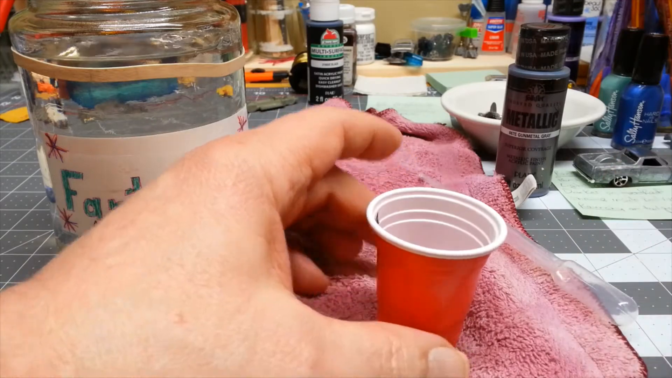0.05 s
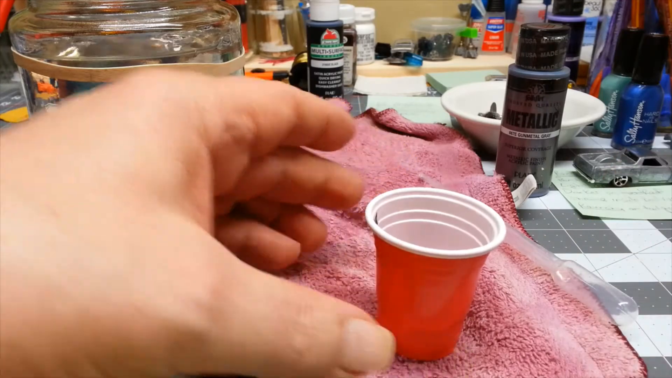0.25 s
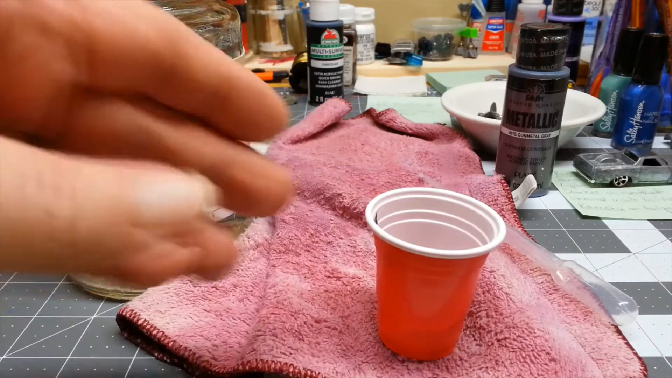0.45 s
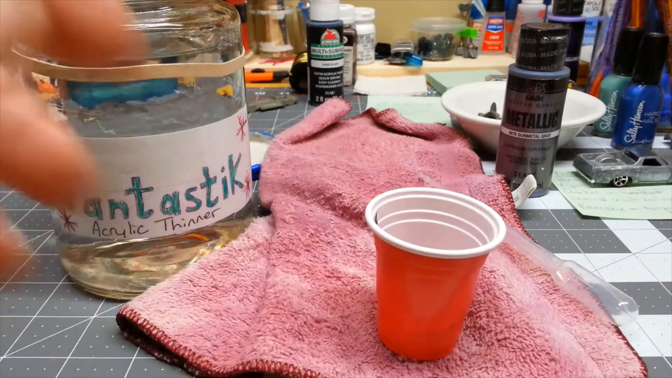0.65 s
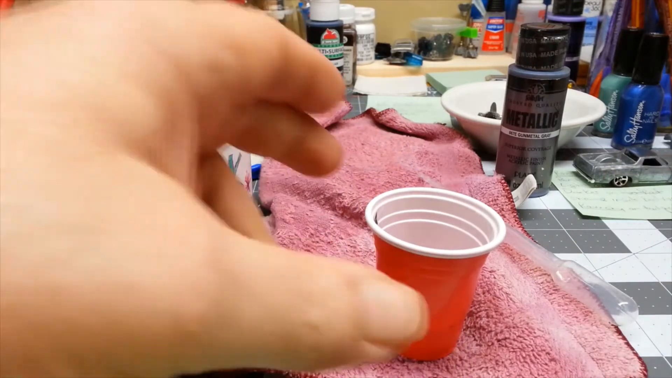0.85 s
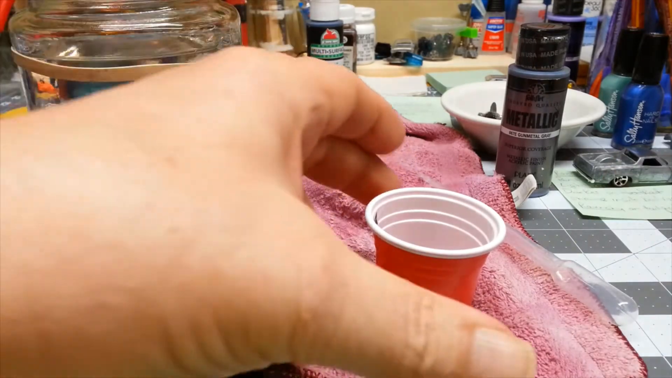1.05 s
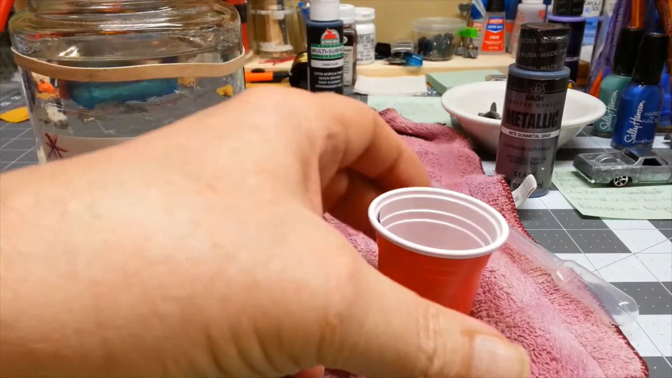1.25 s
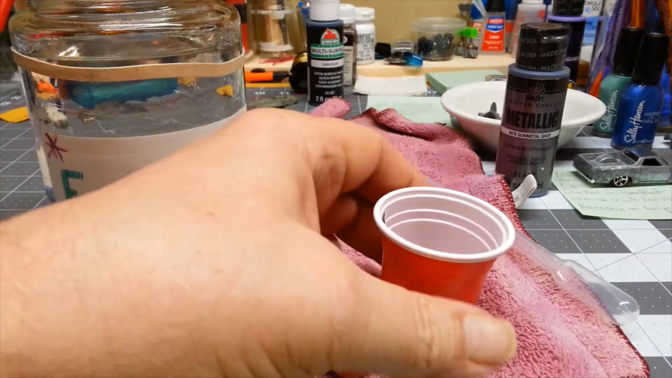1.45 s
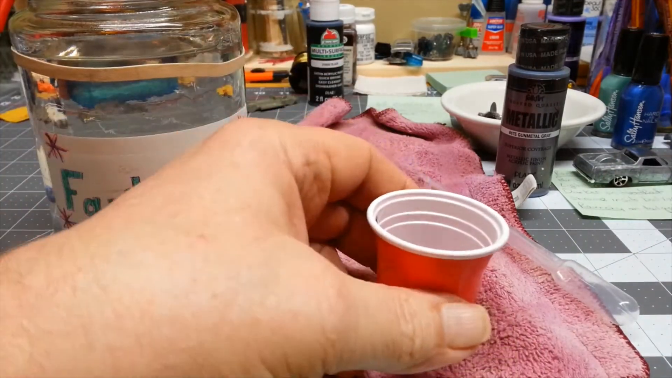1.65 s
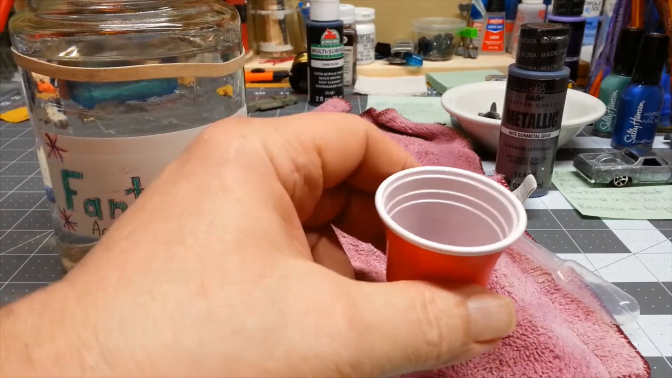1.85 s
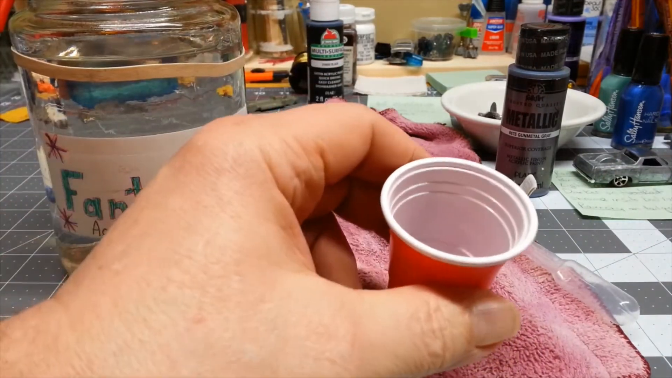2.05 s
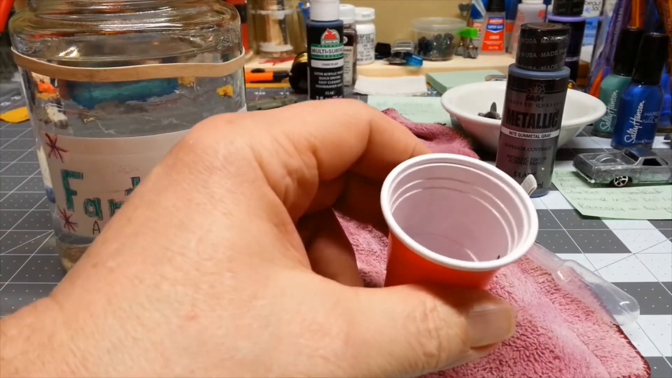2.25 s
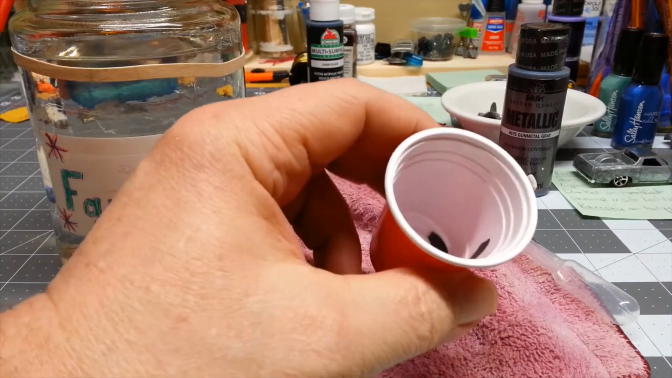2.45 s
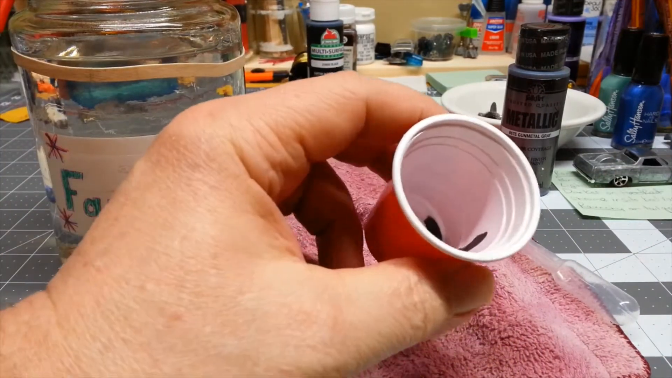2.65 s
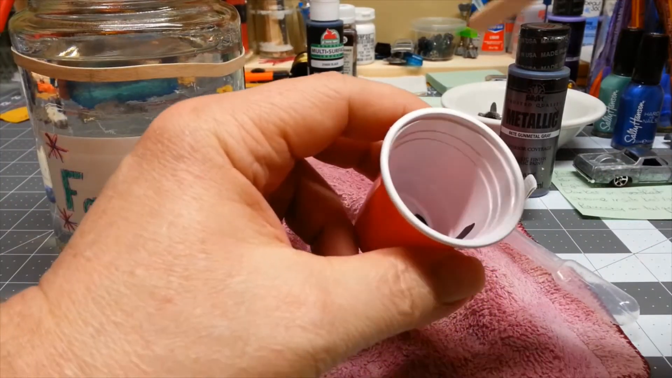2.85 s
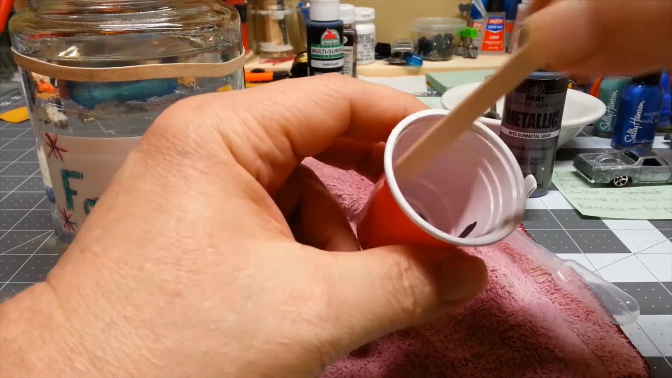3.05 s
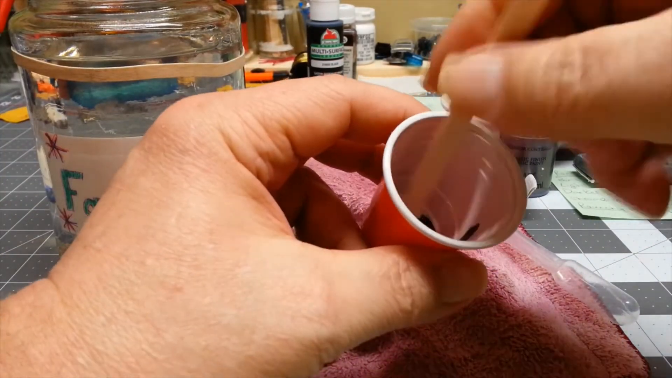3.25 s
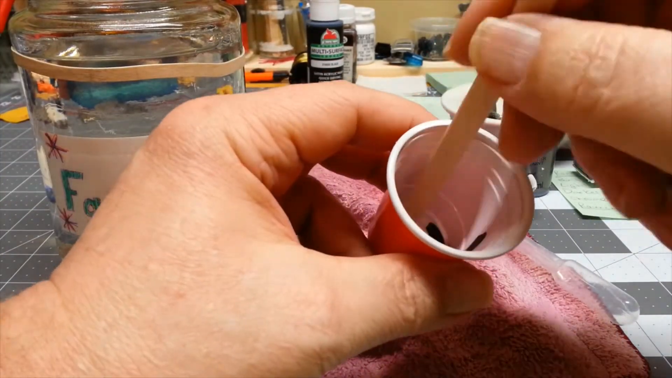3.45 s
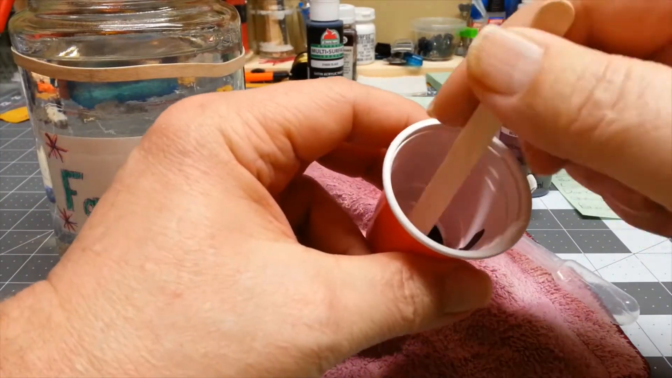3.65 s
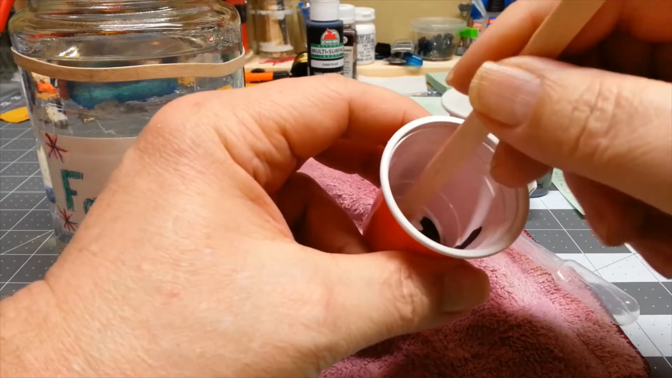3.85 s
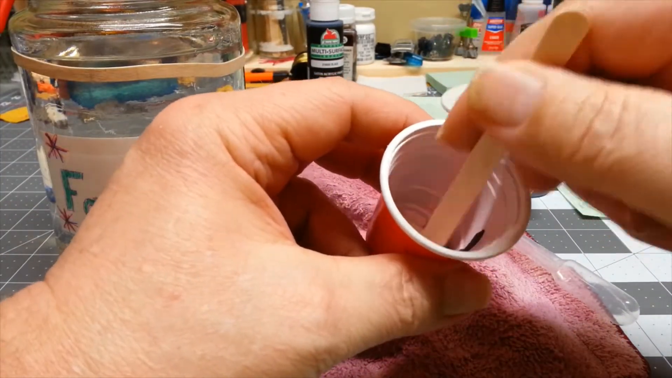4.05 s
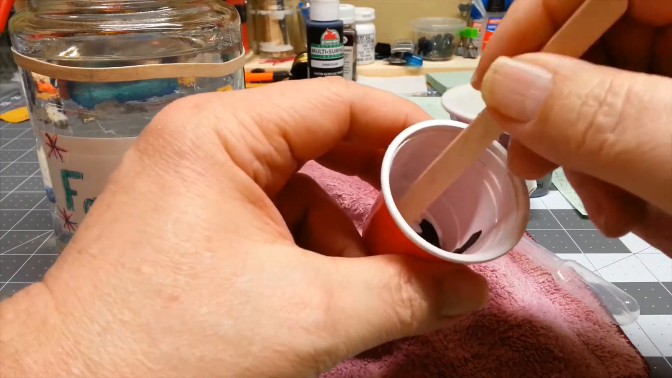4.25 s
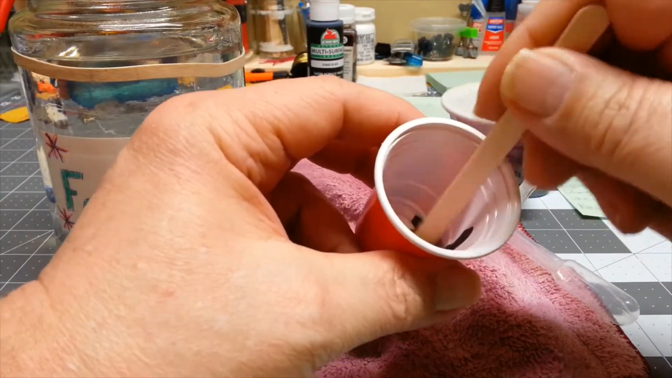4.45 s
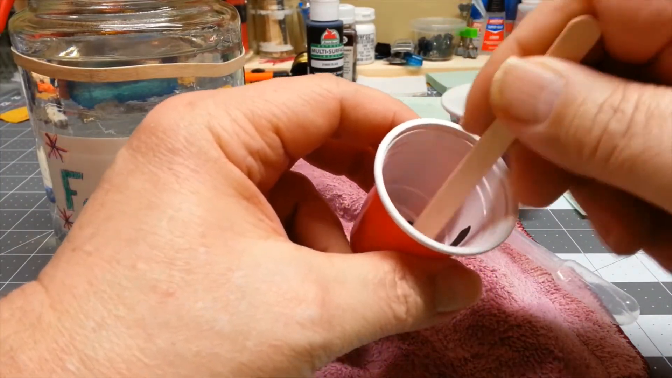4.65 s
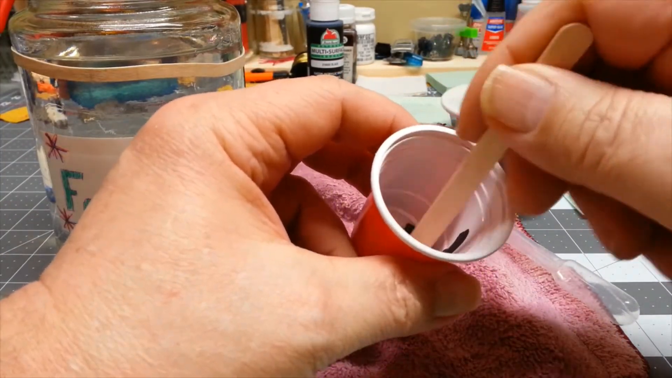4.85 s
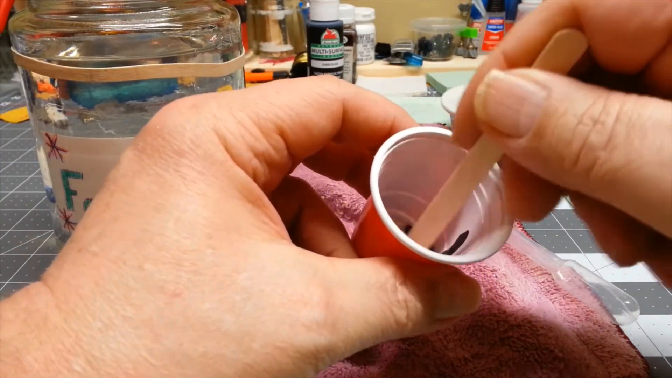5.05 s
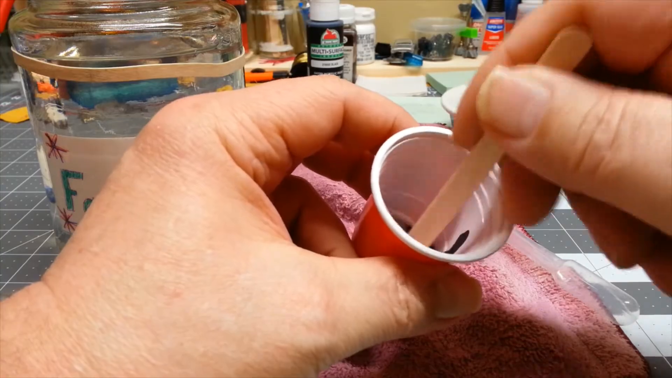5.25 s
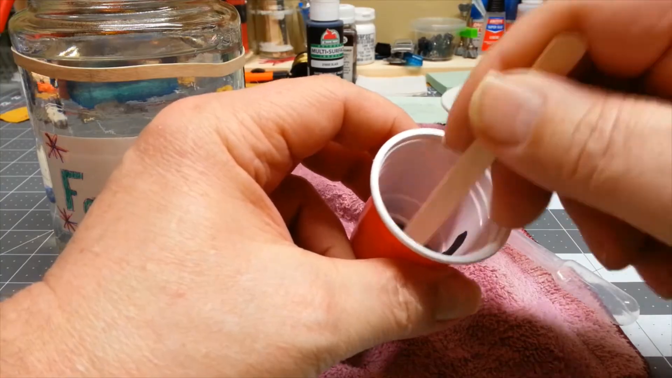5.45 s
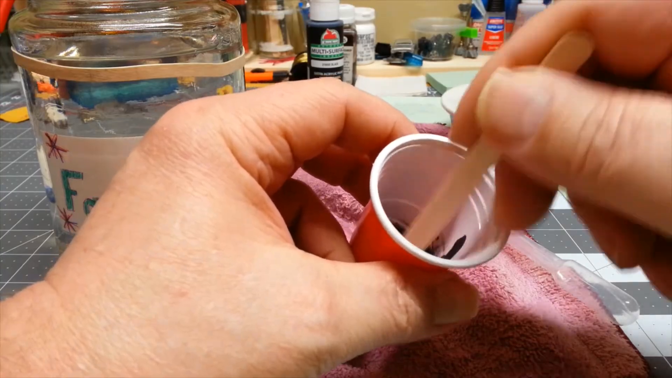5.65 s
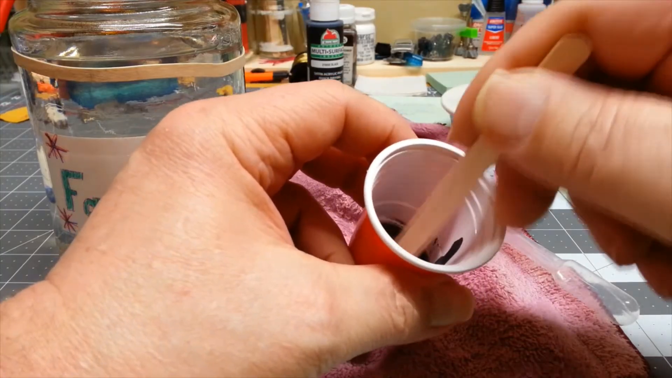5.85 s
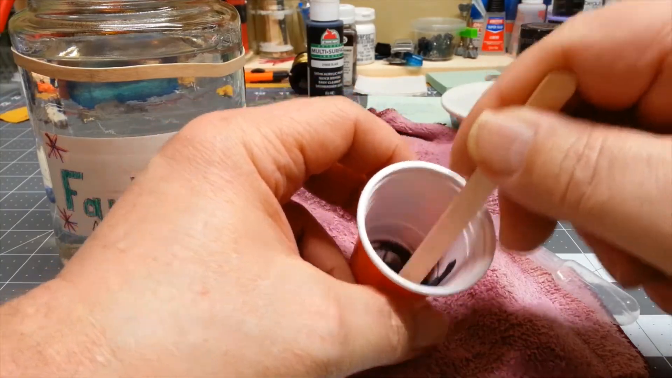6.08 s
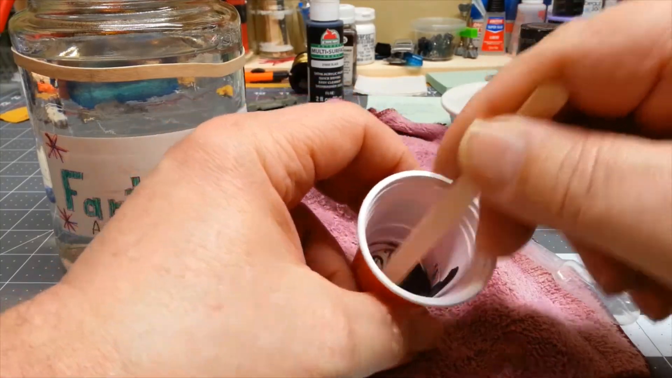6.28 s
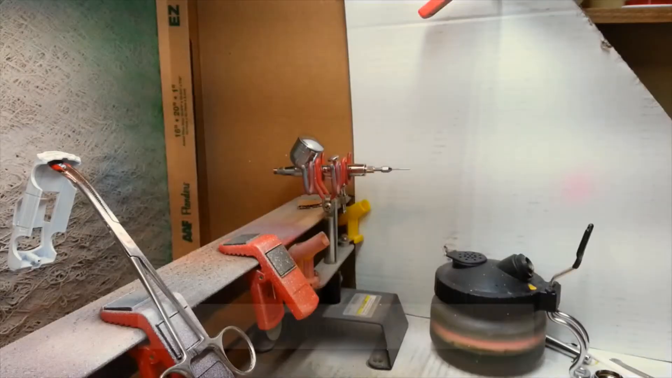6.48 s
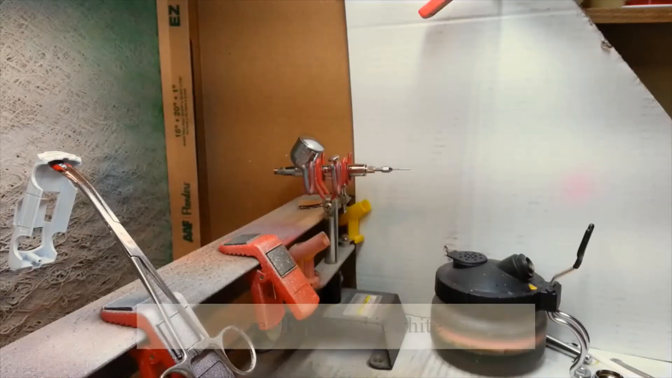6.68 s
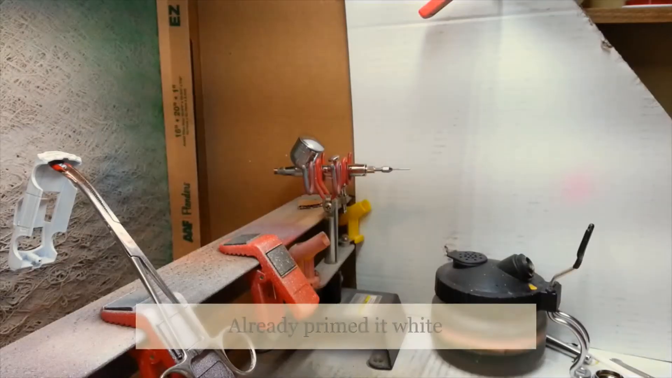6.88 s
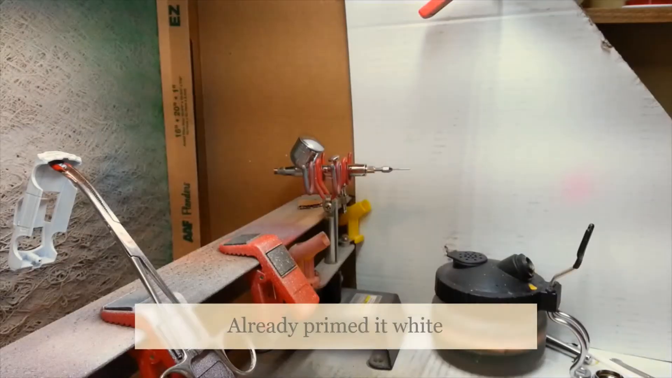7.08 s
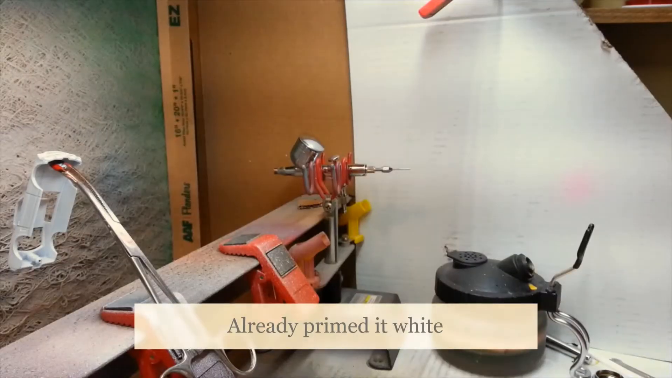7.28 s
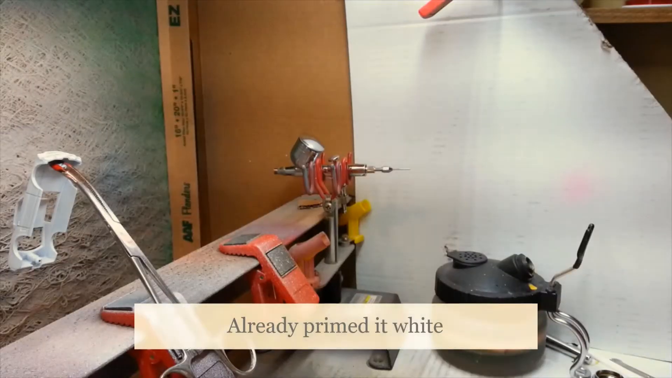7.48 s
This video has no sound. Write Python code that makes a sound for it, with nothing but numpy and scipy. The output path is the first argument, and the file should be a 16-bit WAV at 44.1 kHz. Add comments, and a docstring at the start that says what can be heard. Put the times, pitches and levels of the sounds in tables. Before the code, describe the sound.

Close to a stereo microphone in a quiet workshop, skin rubs on a towel and on a small plastic cup, with soft bumps and a couple of crisp plastic snaps. Next, a wooden stick clicks and scrapes irregularly around the inside of the cup for a few seconds. The stirring ends abruptly as a running extractor fan takes over, with rushing air and a low motor hum.

```python
"""Stick in a plastic cup, then a fan

Close to a stereo microphone on a workshop bench, a hand slides over a towel and takes up a small plastic
cup. A wooden stick taps and scrapes inside it, ringing the wall. Quiet room tone with mains hum swells
whenever a noise suppressor opens. At the end the scene cuts to a running extractor fan."""
import sys
import numpy as np
from scipy import signal
from scipy.fft import rfft, irfft
from scipy.io import wavfile
from scipy.ndimage import uniform_filter1d

SR = 44100
rng = np.random.default_rng(int(sys.argv[2]) if len(sys.argv) > 2 else 0)


def persist_wave(psi):
    """Save psi, clipped to +-1, as 16-bit WAV."""
    counts = np.round(np.clip(psi, -1, 1) * 32767).astype(np.int16)
    wavfile.write(sys.argv[1], SR, np.atleast_2d(counts).T)


N = 331632
TIME_S = np.arange(N) / SR

# Noise spectra. Each row: frequency in Hz, relative density in dB.
ROOM_SPECTRUM = [(40, -6.5), (90, -2), (222, -6), (328, -0.5), (380, -6.5), (697, -17), (2540, -21.5),
                 (7610, -22.5), (11500, -19.5), (14500, -24), (14900, -55.5)]
FAN_SPECTRUM = [(25, -48), (50, -22.5), (85, -11), (165, -10), (215, -15), (361, -13), (640, -17.5),
                (750, -16), (1590, -27), (1900, -24.5), (2700, -29), (3750, -25.5), (4840, -32.5),
                (7600, -31.5), (11800, -49.5), (13000, -80)]
RUSTLE_SPECTRUM = [(530, -44), (900, -33), (1650, -17.5), (2070, -3.5), (2760, -6.5), (3890, 0.5),
                   (8050, 0), (12000, -15), (14500, -12), (14900, -71.5)]
RUB_SPECTRUM = [(88, -44.5), (150, -8.5), (485, -4), (889, -6), (1510, -4), (1670, -3.5), (3500, -17),
                (4550, -34.5), (7700, -120)]
# Likeness at the microphone's two ports. Each row: frequency in Hz, left-right correlation.
BENCH_LIKENESS = [(60, 0.29), (500, 0.54), (2000, 0.058), (10000, 0.15)]
FAN_LIKENESS = [(60, 0.28), (300, 1), (1000, 0.22), (4000, 0.025), (12000, 0.038)]
# Colour of the ports. Each row: frequency in Hz, left over right in dB.
PORT_COLOUR = [(100, 1.5), (450, 4), (2100, 1.5), (4500, 7), (5600, 0), (7500, -11), (9600, -4),
               (12000, 1.5)]
FAN_SHADOW = [(8000, -3.5), (12000, -15)]   # the left port faces away from the fan
# Duct resonances. Each row: frequency in Hz, wander in Hz, level in dB.
DUCT_TONES = [(257, 12.19, -40), (357.7, 4.51, -41), (371, 5.17, -43.5)]
# Soft bumps through the bench. Each row: time in seconds, push in dB, frequency in Hz.
BENCH_BUMPS = [(0.433, -43.5, 363), (1.271, -35, 265), (1.285, -38.5, 181), (1.89, -37, 276),
               (2.09, -35, 348), (2.101, -39.5, 104), (2.151, -37, 249), (4.371, -36, 106),
               (4.479, -41, 69.5), (4.529, -41.5, 81.4)]
# Skin and towel rubbing. Each row: start and end in seconds, rustle in dB, low rub in dB.
HAND_STROKES = [(0.172, 0.223, -64.5, -88), (0.245, 0.38, -67.5, -72), (0.36, 0.501, -61, -70),
                (0.769, 0.795, -53, -39), (1.145, 1.252, -74.5, -76), (1.263, 1.352, -58, -52),
                (1.412, 1.48, -50, -64.5), (1.448, 1.507, -41, -48), (1.518, 1.59, -40.5, -54.5),
                (1.624, 1.701, -46.5, -52), (1.742, 1.8, -59.5, -53.5), (1.797, 1.872, -77.5, -54),
                (1.879, 1.901, -34, -42.5), (1.908, 1.934, -24, -47.5), (1.95, 2.008, -53, -58),
                (2.061, 2.106, -49, -56), (2.138, 2.199, -45.5, -46), (2.281, 2.357, -58, -80),
                (2.425, 2.499, -61.5, -94), (2.498, 2.656, -75.5, -85), (2.75, 2.827, -58.5, -94.5),
                (2.856, 2.891, -63.5, -70), (2.953, 2.977, -64.5, -69.5)]
# Skin rasping on the cup as the grip shifts. Each row: time in seconds, pitch in Hz.
SKIN_PITCH = [(1.38, 4070), (1.42, 3270), (1.52, 3060), (1.56, 4260), (1.931, 5170), (2.1, 3800)]
# Plastic snapping under the fingers. Each row: time in seconds, level in dB.
PLASTIC_SNAPS = [(0.194, -62), (1.269, -38.5), (1.8867, -7.5), (1.938, -15.5), (2.085, -34.5),
                 (2.1443, -35), (2.962, -44)]
# The cup's modes. Each row: frequency in Hz, level in dB, seconds to fall 60 dB before hand damping.
CUP_MODES = [(465, -22, 0.049), (1013, -22.5, 0.06), (1157, -16, 0.01), (1285, -7.5, 0.037),
             (1450, -5.5, 0.037), (1557, 0, 0.091), (1697, -7.5, 0.015), (1867, -7.5, 0.035),
             (2067, -7.5, 0.022), (3800, 3, 0.016), (4050, 3.5, 0.012), (4530, 1.5, 0.0052),
             (4770, -2, 0.008), (5400, 2.5, 0.007), (6820, 7, 0.019), (6840, 7, 0.016), (7730, 5, 0.022),
             (9150, -3, 0.0038), (9660, -3.5, 0.0031), (12070, -1, 0.0031)]
# Clear taps on the wall. Each row: time in seconds, level in dB, treble offset in dB.
STICK_TAPS = [(3.12, -28, 0.5), (3.139, -42, 12.5), (3.33, -22, 4.5), (3.346, -30.5, -11),
              (3.562, -27.5, 2), (3.644, -16, -12), (3.668, -21.5, -17), (3.806, -20, -5.5),
              (3.822, -25.5, -27), (3.942, -22.5, 2.5), (3.9685, -18.5, 0), (4.003, -27, -2),
              (4.0055, -10.5, -1), (4.0095, -24, 6), (4.028, -16, -16), (4.131, -28, -1),
              (4.299, -29.5, 6.5), (4.392, -35.5, 13), (4.409, -26, -13), (4.431, -23, -2.5),
              (4.4405, -32, -12), (4.4808, -26.5, -18), (4.519, -29, -14), (4.54, -30, -23),
              (4.546, -23.5, -16), (4.5575, -29, -6), (4.643, -32.5, -5), (4.6718, -27.5, 6),
              (4.777, -30, -0.5), (4.792, -32, -23), (4.878, -27, 6.5), (4.92, -25, -6), (4.951, -24, -23),
              (4.9588, -28, -17), (4.9665, -15.5, -11), (5.081, -24, -4), (5.11, -15, -14),
              (5.1275, -29, -16), (5.158, -19, -12), (5.1637, -18, -9), (5.169, -15, -9.5),
              (5.194, -40, 10), (5.3, -34, -1), (5.314, -17.5, -19), (5.3437, -25, -5), (5.376, -18, -29),
              (5.393, -23, -28), (5.418, -25, -9), (5.487, -24.5, -7.5), (5.506, -25, -8),
              (5.552, -23.5, -2), (5.584, -33, 9.5), (5.5882, -20, 2), (5.601, -27, -12), (5.607, -29, 8),
              (5.716, -28.5, 0.5), (5.7247, -23.5, -17), (5.767, -27.5, -1.5), (5.8055, -29, -10),
              (5.811, -25.5, 0), (5.817, -17, -8), (5.8415, -23, -5), (5.89, -26, -16), (5.8978, -28, -10),
              (5.9305, -15.5, -3.5), (5.982, -27.5, -12), (6.0203, -32, -6), (6.0255, -14.5, -15),
              (6.151, -26.5, 8), (6.233, -25.5, 10.5), (6.354, -19, 7.5), (6.375, -15, -51),
              (6.456, -31.5, -7)]
# Drags on the wall. Each row: start and end in seconds, low-mode knock in dB, high-mode hiss in dB.
STICK_DRAGS = [(3.101, 3.186, -99, -85), (3.322, 3.355, -87, -74.5), (3.402, 3.466, -97.5, -74.5),
               (3.62, 3.676, -76.5, -76), (3.783, 3.851, -86, -84), (3.937, 3.964, -76, -72),
               (4.001, 4.016, -61, -52.5), (4.043, 4.135, -84.5, -79.5), (4.16, 4.226, -100, -82.5),
               (4.275, 4.305, -94, -78), (4.366, 4.449, -76, -73), (4.51, 4.545, -66.5, -65),
               (4.594, 4.664, -74.5, -69.5), (4.767, 4.757, -66, -71), (4.908, 4.977, -69.5, -70.5),
               (5.075, 5.183, -70, -69), (5.292, 5.404, -69, -70.5), (5.474, 5.57, -75.5, -77),
               (5.566, 5.592, -63.5, -59.5), (5.709, 5.86, -72.5, -76), (5.887, 6, -72.5, -73.5),
               (6.001, 6.025, -62, -63), (6.112, 6.14, -72, -76), (6.215, 6.235, -75.5, -69.5),
               (6.36, 6.362, -79, -67)]
# The cup's rasp as the stirring goes on. Each row: time in seconds, gain in dB.
RASP_LEVEL = [(3.1, -14.5), (3.7, -7), (3.998, 7), (4.3, -19), (4.55, 5.5), (5.0, -9), (5.4, -5),
              (5.8, -6.5), (6.4, -12)]
# Balance of the low wall modes as the stick moves about. Each row: time in seconds, dB per octave.
WALL_TILT = [(3.1, 7), (3.35, -17), (3.65, 23.5), (3.999, 11), (4.5, 23), (4.95, -3.5), (5.55, 1), (6.0, 2),
             (6.399, -10)]

CUT_S = 6.478   # from the bench to the fan


def from_db(db):
    """Decibels to gain."""
    return 10 ** (np.asarray(db) / 20)


def unit_rms(x):
    """Scale to unit rms."""
    return x / np.sqrt(np.mean(x ** 2) + 1e-20)


def at_hz(points, hz):
    """Read a spectrum on a log-frequency axis."""
    points_hz, values = np.transpose(points)
    return np.interp(np.log(hz), np.log(points_hz), values)


def over_time(points):
    """Glide through rows of time and value."""
    return np.interp(TIME_S, *np.transpose(points))


def drift(rate_hz):
    """Slow random wander of unit rms."""
    r = np.exp(-80 * np.pi * rate_hz / SR)
    slow = signal.lfilter([1], [1, -2 * r, r * r], rng.standard_normal(N // 40 + 2002))[2000:]
    return np.interp(np.arange(N) / 40, np.arange(len(slow)), unit_rms(slow))


def ring(clicks, hz, t60):
    """A unit click sets a sine of height 1 ringing."""
    r, w = from_db(-60 / (max(t60, .002) * SR)), 2 * np.pi * hz / SR
    return signal.lfilter([0, np.sin(w)], [1, -2 * r * np.cos(w), r * r], clicks + 1e-18)


def place(x, pan_db, lag):
    """Pan a stereo pair; the left port hears it lag samples late."""
    left = np.interp(np.arange(N) - lag, np.arange(N), x[0])
    return np.array([left * from_db(pan_db / 2), x[1] * from_db(-pan_db / 2)])


def balance(x, points):
    """Share the power between left and right, frequency by frequency."""
    left = from_db(at_hz(points, np.maximum(np.fft.rfftfreq(N, 1 / SR), 1)))
    return irfft(rfft(x) * np.array([left, np.ones_like(left)]) * np.sqrt(2 / (1 + left ** 2)), N)


def coloured(spectrum, likeness):
    """Stereo noise of unit rms with a spectrum and a left-right likeness."""
    hz = np.maximum(np.fft.rfftfreq(N, 1 / SR), 1)
    mid, side = rfft(rng.standard_normal((2, N)))
    alike = np.clip(at_hz(likeness, hz), -1, 1)
    pair = np.sqrt(1 + alike) * mid + np.sqrt(1 - alike) * side * [[1], [-1]]
    return unit_rms(irfft(pair * from_db(at_hz(spectrum, hz)), N))


def grains(per_s, spread_db):
    """Random clicks of uneven size, at unit rms."""
    sizes = from_db(spread_db * np.minimum(rng.exponential(1, N), 4)) * rng.choice([-1, 1], N)
    return unit_rms(sizes * (rng.random(N) < per_s / SR))


def strokes(rows, levels_db, rise_s, fall_s):
    """Gain over time: each stroke rises, holds its level and dies away."""
    power = np.zeros(N)
    for (start, end, *_), db in zip(rows, levels_db):
        span = slice(int(start * SR), int((end + 12 * fall_s) * SR))
        rise = np.minimum((TIME_S[span] - start) / rise_s, 1)
        fall = np.exp(-np.maximum(TIME_S[span] - end, 0) / fall_s)
        power[span] += (from_db(db) * rise * fall) ** 2
    return np.sqrt(power)


def room_tone(near, mains_hz=59.8):
    """Workshop air and mains hum, held down by a noise suppressor that opens as the near sound grows."""
    tone = from_db(-72.5) * coloured(ROOM_SPECTRUM, BENCH_LIKENESS)
    tone += from_db(-75.5 + 2.02 * drift(9.8)) * np.sqrt(2) * np.sin(2 * np.pi * mains_hz * TIME_S)
    near_power = uniform_filter1d(np.mean(near ** 2, axis=0), round(0.032 * SR))
    near_db = 10 * np.log10(near_power + 1e-10)
    opening_db = np.clip(0.62 * (near_db + 70.5), 0, 17)
    smoothing = np.exp(-1 / (0.0035 * SR))
    return tone * from_db(signal.lfilter([1 - smoothing], [1, -smoothing], opening_db))


def extractor_fan(hum_hz=120, fade_in_s=0.042):
    """Rushing air, the motor's twice-mains hum and a few duct resonances, heard from the cut on."""
    out = from_db(-28.5 + .7 * drift(10)) * balance(coloured(FAN_SPECTRUM, FAN_LIKENESS), FAN_SHADOW)
    out += from_db(-30.5) * np.sqrt(2) * np.sin(2 * np.pi * hum_hz * TIME_S)
    for hz, wander_hz, level_db in DUCT_TONES:
        wander = np.cumsum(wander_hz * drift(12.24)) / SR
        out += from_db(level_db) * np.sqrt(2) * np.sin(2 * np.pi * (hz * TIME_S + wander))
    fade_in = np.clip((TIME_S - CUT_S) / fade_in_s, 0, 1) ** 2
    return place(out * fade_in, pan_db=0.18, lag=15.0)


def bench_echo(x, level_db=-10.5, t60_s=.11):
    """A short diffuse tail from bench and walls, its own for each port."""
    age = np.arange(SR // 4) / SR
    tail = rng.standard_normal((2, len(age))) * from_db(-60 * age / t60_s) * (age > .003)
    tail /= np.sqrt(np.sum(tail ** 2, axis=1, keepdims=True))
    return from_db(level_db) * signal.fftconvolve(x, tail, axes=1)[:, :N]


def bench_bumps(ring_cycles=9.4):
    """Each soft push rings one low, damped mode, heard through the bench."""
    out = np.zeros(N)
    for s, push_db, hz in BENCH_BUMPS:
        push = np.zeros(N)
        push[round(s * SR)] = from_db(push_db)
        out += ring(push, hz, t60=ring_cycles / hz)
    return signal.lfilter([.07], [1, -.93], out)   # low-pass softens the onset


def hand():
    """Close up, left of centre: towel fibres rustle in fine clumps; the bench passes on a duller rub."""
    rustle_db, rub_db = np.transpose(HAND_STROKES)[2:]
    pressure = strokes(HAND_STROKES, rustle_db, rise_s=0.025, fall_s=0.016)
    rustle = coloured(RUSTLE_SPECTRUM, BENCH_LIKENESS) * from_db(3.6 * drift(150))
    fibres = np.roll(rustle, SR, axis=1)   # other fibres, unrelated in phase
    rasp_hz = over_time(SKIN_PITCH)
    rasp = sum(unit_rms(ring(fibres, hz, 0.004)) * np.clip(1 - np.abs(rasp_hz - hz) / 550, 0, 1)
               for hz in range(3000, 5800, 550))
    firmness = np.minimum(np.sqrt(pressure / from_db(-48.5)), 1)
    lightness = np.clip(1 - np.sqrt(pressure / from_db(-45.5)), 0, 1)
    rustle += from_db(-3.5) * rasp * firmness   # firm rubs make the cup rasp
    rustle += from_db(-6) * unit_rms(ring(fibres[::-1], 7970, 0.0032))   # a thin treble peak
    rustle += from_db(3) * unit_rms(ring(fibres[::-1], 10500, 0.0011)) * lightness
    rub = coloured(RUB_SPECTRUM, BENCH_LIKENESS) * from_db(2 * drift(39))
    push = strokes(HAND_STROKES, rub_db, rise_s=0.0098, fall_s=0.028)
    bass = signal.sosfilt(signal.butter(2, 650, fs=SR, output="sos"), rub)
    rub = bass + (rub - bass) * np.minimum(push / from_db(-45), 1)   # light rubs keep only their bass
    return place(rustle * pressure + rub * push, pan_db=1, lag=-12.5)


def plastic_snaps(decay_s=0.0033):
    """The cup snaps under the fingers, each time a few milliseconds of bright noise."""
    out, noise = np.zeros((2, N)), coloured(RUSTLE_SPECTRUM, BENCH_LIKENESS)
    for s, level_db in PLASTIC_SNAPS:
        age = TIME_S - s
        out += from_db(level_db) * (age > 0) * np.exp(-np.abs(age) / decay_s) * noise
    return place(out, pan_db=1, lag=-12.0)


def stick_in_cup(treble_hz=2800, pivot_hz=1653, hiss_dull_hz=8800, chatter_s=0.0015, most_cycles=45):
    """Close up: taps and drags ring the same cup modes; each port hears a mode at its own strength."""
    tap_s, tap_db, sharp_db = np.transpose(STICK_TAPS)
    tap_at = np.round(tap_s * SR).astype(int)
    chance = rng.standard_normal((len(tap_s), len(CUP_MODES), 3))
    knock_db, hiss_db = np.transpose(STICK_DRAGS)[2:]
    hiss = strokes(STICK_DRAGS, hiss_db, rise_s=0.0073, fall_s=0.019)
    knock = strokes(STICK_DRAGS, knock_db, rise_s=.008, fall_s=.018)
    slips = grains(per_s=500, spread_db=5) * from_db(2.5 * drift(60))   # stick-slip along the ridges
    skips = from_db(-3) * grains(per_s=60, spread_db=3)   # the dragged stick skips in small taps
    rasp_gain, octave_gain = from_db(over_time(RASP_LEVEL)), from_db(over_time(WALL_TILT))
    tap_tilt = 2.5 * rng.standard_normal(len(tap_s))   # dB per octave
    chatter_decay = np.exp(-1 / (chatter_s * SR))
    grip = rng.choice([-1, 1], len(tap_s))   # squeezing tunes the cup down or up from tap to tap
    white = rng.standard_normal((3, N))
    lowest, wall = np.zeros((2, 2, N))
    span = slice(3 * SR, 13 * SR // 2)   # while the stick is in the cup
    for k, (hz, mode_db, t60) in enumerate(CUP_MODES):
        rasps = 3300 < hz < 4150   # these modes answer dull contacts too
        high = hz > treble_hz and not rasps
        noise = np.roll(white, k * SR // 4, axis=1)
        rough = slips + 0.49 * noise[:2]
        if high:
            drag = hiss * min(hiss_dull_hz / hz, 1) ** 2 * (rough + from_db(-9) * skips)
        else:
            drag = knock * (rough + skips)
        spread_db = 3 * chance[:, k, 2] + 2 * chance[:, k, :2].T   # shared, then port by port
        octaves = np.log2(hz / pivot_hz) * (k > 0 and hz < treble_hz)
        strength = from_db(tap_db - 7.5 + high * sharp_db + tap_tilt * octaves + spread_db)
        gain = from_db(mode_db) * (rasp_gain[span] if rasps else octave_gain[span] ** octaves)
        polarity = (-1) ** k if hz > treble_hz else 1
        t60 = min(t60, most_cycles / hz)   # the gripping hand damps the ring
        layer = wall if k else lowest
        for squeeze in (-1, 1):
            taps = np.full((2, N), 1e-18)
            taps[:, tap_at] = strength * (grip == squeeze)
            # The contact chatters for a moment, so no two taps ring alike.
            chatter = 0.1 * noise[2, span] * signal.lfilter([0, 1], [1, -chatter_decay], taps[:, span])
            force = taps[:, span] + chatter + drag[:, span]
            layer[:, span] += polarity * gain * ring(force, hz * (1 + .02 * squeeze), t60)
    low_cut = signal.butter(4, 820, "high", fs=SR, output="sos")   # leaves the bass to the lowest mode
    return place(lowest + signal.sosfilt(low_cut, wall), pan_db=0.33, lag=4.61)


def scene(dip_s=0.674, dip_half_s=0.044, dip_db=-21, fade_out_s=0.036):
    """At the bench, where the level dips briefly early on; then at the fan."""
    near = stick_in_cup() + hand() + plastic_snaps()
    near += bench_echo(near)
    bench = near + bench_bumps() + room_tone(near)
    dip = from_db(dip_db * np.clip(1 - np.abs(TIME_S - dip_s) / dip_half_s, 0, 1))
    fade_out = np.clip((CUT_S - TIME_S) / fade_out_s + .5, 0, 1)
    return bench * dip * fade_out + extractor_fan()


def record(dry, cutoff_hz=16500):
    """The microphone's ports colour the sound, the right one peaking in the treble; the top is cut."""
    top_cut = signal.cheby2(12, 70, cutoff_hz, fs=SR, output="sos")
    return signal.sosfilt(top_cut, balance(dry, PORT_COLOUR))


dry = scene()
out = record(dry)
persist_wave(out)
```